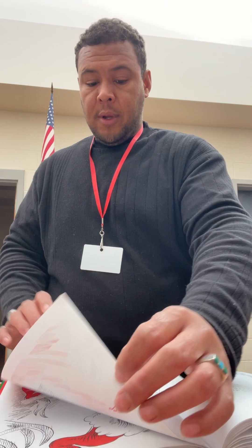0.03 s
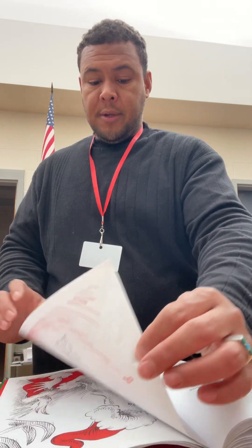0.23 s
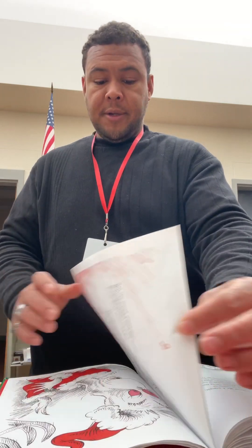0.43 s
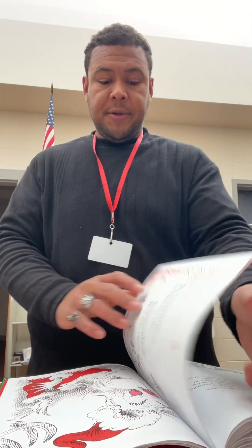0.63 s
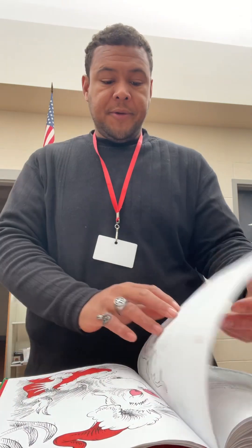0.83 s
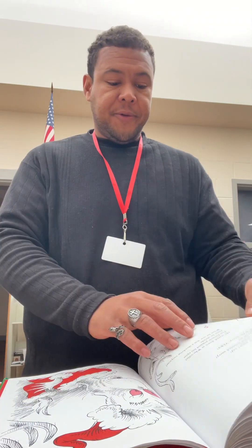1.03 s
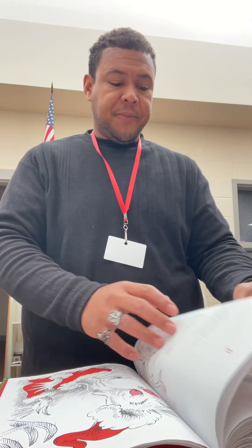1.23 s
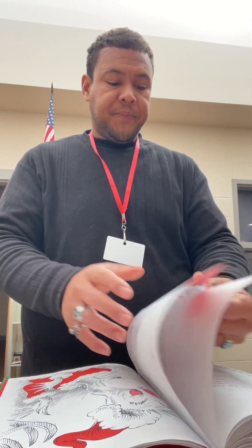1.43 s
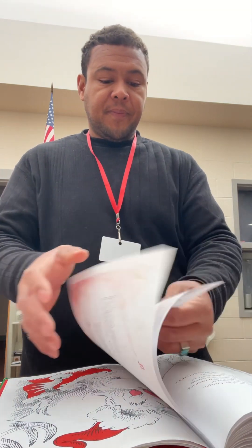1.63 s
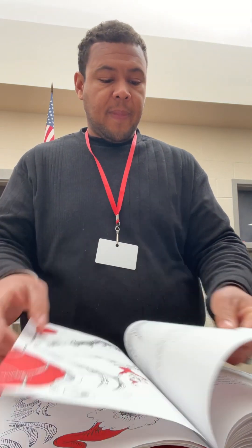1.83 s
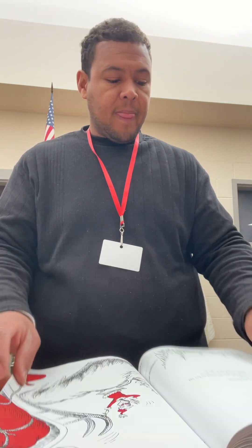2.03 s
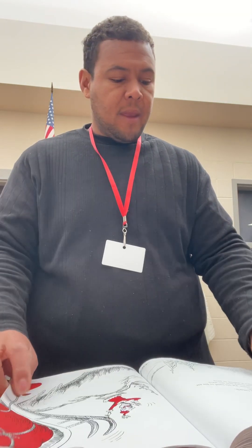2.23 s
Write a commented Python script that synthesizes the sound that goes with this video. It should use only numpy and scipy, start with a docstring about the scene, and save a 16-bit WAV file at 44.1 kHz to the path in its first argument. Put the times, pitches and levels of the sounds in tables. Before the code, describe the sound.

A large book page is turned by hand, buckling in a quick run of snaps. Paper then slides over paper in a grainy swell and flaps softly down, close to the microphone, over low ventilation rumble.

```python
"""Ventilation rumbles in a quiet room as a large, stiff picture-book page is lifted close to the microphone.
The sheet wafts the air and buckles in a run of snaps, each a bending wave whose treble arrives
before its bass. After a second, paper slides over paper in one long grainy swell, with small ticks.
The page flaps softly down, and a last light crease follows."""
import sys
import numpy as np
from scipy import signal
from scipy.fft import rfft, irfft, next_fast_len
from scipy.io import wavfile
from scipy.ndimage import uniform_filter1d, map_coordinates

SR = 44100
rng = np.random.default_rng(int(sys.argv[2]) if len(sys.argv) > 2 else 0)


def generate_wav(signal):
    """Clip the signal to [-1, 1] and save it as 16-bit WAV at the path in sys.argv[1]."""
    frames = np.transpose(np.atleast_2d(signal))
    scaled = np.clip(frames, -1, 1) * 32767
    pcm = np.round(scaled).astype(np.int16)
    wavfile.write(sys.argv[1], SR, pcm)


N = 101429
TIME = np.arange(N) / SR


def amp(db):
    return 10 ** (np.asarray(db) / 20)


def unit(x):
    return x / np.sqrt(np.mean(x ** 2) + 1e-20)


def along(points, hz):
    """Read a curve of (Hz, value) points on a log frequency axis."""
    freqs, values = np.transpose(points)
    return np.interp(np.log(hz + 1), np.log(freqs + 1), values)


def curves(rows):
    """One envelope for each column after the time."""
    times, *columns = np.transpose(rows)
    return [np.interp(TIME, times, column) for column in columns]


def wobble(rate):
    """A random curve with rate knots a second."""
    return map_coordinates(rng.standard_normal(N), [TIME * rate], order=1)


def swell(peak_s, rise, fall):
    """A smooth rise to 1 at the peak and a trailing fall."""
    t = TIME - peak_s
    return np.exp(-.5 * np.where(t < 0, (t / rise) ** 2, np.abs(t / fall) ** 1.45))


def burst(t60, size):
    """Dying noise of energy 1."""
    x = rng.standard_normal(size) * amp(-60 * np.arange(size) / SR / t60)
    return x / np.linalg.norm(x)


def filtered(x, response):
    """Shape x with a complex response, given as a function of frequency."""
    size = next_fast_len(N + SR // 2)
    return irfft(rfft(x, size) * response(np.fft.rfftfreq(size, 1 / SR)), size)[..., :N]


def minimum_phase(gain):
    """The causal response with this gain and the tightest attack."""
    cepstrum = irfft(np.log(np.maximum(gain, 1e-6)))
    folded = np.concatenate([cepstrum[:1], 2 * cepstrum[1:len(cepstrum) // 2]])
    return np.exp(rfft(folded, len(cepstrum)))


# Stereo image of the noise layers. Each row: frequency in Hz, left-right correlation (1 is mono).
STEREO_LIKENESS = [(100, 1), (700, 0.89), (3000, 0.53), (13000, 1)]
def rush(colour_db):
    """Stereo noise of rms 1, coloured by a function of frequency."""
    def mid_and_side(hz):
        width = np.arccos(np.clip(along(STEREO_LIKENESS, hz), -1, 1)) / 2
        return amp(colour_db(hz)) * [np.cos(width), np.sin(width)]
    mid, side = filtered(rng.standard_normal((2, N)), mid_and_side)
    return unit(np.array([mid + side, mid - side]))


# Tone of the ventilation. Each row: frequency in Hz, gain in dB.
VENT_EQ = [(20, -6.5), (60, 1.5), (220, -1.5), (450, -13), (800, -12), (1600, -20), (2200, -10.5),
           (3200, -26), (5500, -30), (13000, -42), (16000, -62)]
def ventilation():
    """A steady bed of rumbling air."""
    return amp(-49.5) * rush(lambda hz: along(VENT_EQ, hz))


def room(x, t60=0.57, predelay_s=0.0074):
    """A diffuse tail, mostly common to left and right."""
    common = burst(t60, SR // 2)
    tails = np.array([common + 0.5 * burst(t60, SR // 2) for _ in range(2)])
    tails = np.pad(tails, ((0, 0), (int(predelay_s * SR), 0)))
    return signal.fftconvolve(x, tails, axes=1)[:, :N]


# Fader ride of the waft. Each row: time in seconds, level in dB.
WAFT_RIDE = [(0, -41.5), (.15, -62.5), (.27, -49), (.47, -44.5), (.65, -65.5)]
# Tone of the waft. Each row: frequency in Hz, gain in dB.
WAFT_EQ = [(25, -17), (60, 0.5), (110, -16.5), (350, -10), (1500, -56.5)]
def waft():
    """The lifted page pushes a low breath of air."""
    level_db, = curves(WAFT_RIDE)
    return amp(level_db) * rush(lambda hz: along(WAFT_EQ, hz))


def wandering_contact(x, depth_db=2.5):
    """The rasp shifts in colour as the contact wanders over the paper."""
    spectra = signal.stft(x, SR, nperseg=512)[2]
    patches = uniform_filter1d(rng.standard_normal(spectra.shape[1:]), size=4, axis=0)
    patches = unit(uniform_filter1d(patches, size=5, axis=1))
    return unit(signal.istft(spectra * amp(depth_db * patches), SR, nperseg=512)[1][:, :N])


def falling_peak(x, peak_s=1.16, peak_hz=8640, boost_db=9.5, octaves_per_s=3.5):
    """A narrow boost sweeps down the hiss as the sheet slides, fading in and out."""
    width_octaves, life_s = .2, 0.19
    hz, t, spectra = signal.stft(x, SR, nperseg=256)
    octaves_off = np.log2((hz[:, None] + 1) / peak_hz) + octaves_per_s * (t - peak_s)
    lift_db = boost_db * np.exp(-(octaves_off / width_octaves) ** 2 - ((t - peak_s) / life_s) ** 2)
    return signal.istft(spectra * amp(lift_db), SR, nperseg=256)[1][:, :N]


# Tone of the paper's rasp and of its finer hiss. Each row: frequency in Hz, gain in dB.
RASP_EQ = [(250, -40), (600, -13.5), (1250, -10), (1700, -8.5), (2230, -1.5), (2700, -9), (3700, -16),
           (4550, -11.5), (5400, -26), (9000, -72)]
HISS_EQ = [(3500, -46), (5200, 7.5), (8500, -2), (14000, -6), (16000, -19.5)]
# The hand's long slide under the next page. Each row: time in seconds, rasp and hiss levels in dB.
SLIDE_RIDE = [(1.08, -86, -93), (1.11, -52, -59), (1.255, -37, -45), (1.41, -43, -54), (1.47, -40.5, -52.5),
              (1.62, -50.5, -64.5), (1.9, -71, -97)]
# Short rubs. Each row: peak time in seconds, rasp and hiss levels in dB, rise and fall in seconds.
RUBS = [(.343, -40.5, -50.5, 0.02, 0.0015), (0.448, -44, -56.5, 0.02, 0.058),
        (.666, -44.5, -70, .01, 0.0087), (1.683, -42, -51, 0.0075, 0.0091),
        (2.286, -52, -62.5, 0.016, .044)]
def sliding(grains_per_s=600, surges_per_s=49.45):
    """Paper rubs on paper in short strokes and one long slide: a grainy rasp under a hiss."""
    rasp_power, hiss_power = amp(curves(SLIDE_RIDE)) ** 2
    for peak_s, rasp_db, hiss_db, rise, fall in RUBS:
        stroke = swell(peak_s, rise, fall)
        rasp_power += (amp(rasp_db) * stroke) ** 2
        hiss_power += (amp(hiss_db) * stroke) ** 2
    grain = unit(amp(wobble(grains_per_s) + 1.67 * wobble(surges_per_s)))
    rasp = grain * wandering_contact(rush(lambda hz: along(RASP_EQ, hz)))
    hiss = falling_peak(rush(lambda hz: along(HISS_EQ, hz)))
    return np.sqrt(rasp_power) * rasp + np.sqrt(hiss_power) * hiss


# Soft flaps and catches. Each row: peak time in seconds, level in dB, rise and fall in seconds,
# band centre in Hz, band half-width in octaves.
SOFT_FLAPS = [(0.018, -41.5, 0.015, 0.0083, 1880, 0.62), (1.469, -38.5, 0.0033, 0.0034, 4100, 0.12),
              (1.671, -40.5, .002, 0.012, 1240, 0.35), (1.762, -40.5, 0.012, 0.015, 750, 0.88),
              (1.875, -39.5, 0.0057, .014, 1050, 1.18), (1.95, -51.5, 0.044, .015, 677, 0.81)]
def flaps(grains_per_s=300):
    """The loose sheet brushes hand and book, catches and lands: grainy swells of band noise."""
    out = np.zeros((2, N))
    for peak_s, db, rise, fall, centre_hz, octaves in SOFT_FLAPS:
        band = rush(lambda hz: -10 * np.log10(1 + (np.log2((hz + 1) / centre_hz) / octaves) ** 8))
        grain = amp(wobble(grains_per_s))
        out += amp(db) * swell(peak_s, rise, fall) * unit(band * grain)
    return out


def desk_scatter(x, t60=0.017, db=-11.5):
    """The desk scatters each snap differently to left and right; the bass stays centred."""
    scattered = signal.fftconvolve(x, burst(t60, SR // 10))[:N]
    side = filtered(scattered, lambda hz: amp(db) * hz / np.hypot(hz, 400))
    return np.array([x + side, x - side])


def thump(snap_s, hz=82.5, t60=0.13, delay_s=0.0046):
    """The whole sheet rebounds after a snap in a low, quickly damped swing."""
    t = np.maximum(TIME - snap_s - delay_s, 0)
    attack = 1 - np.exp(-t * hz * 2)
    return np.sin(2 * np.pi * hz * t) * attack * amp(-60 * t / t60)


# Tone of the tearing fibres. Each row: frequency in Hz, gain in dB.
FIBRE_EQ = [(1500, -72), (4200, 2.5), (6000, -6), (8000, -10.5), (12000, -11), (15500, -19)]
def fibre_spectrum(size, crackle_db, crack_db, crackle_s=0.0074, crack_s=0.00047):
    """One sharp crack, then fibres tear for a moment in a spiky run."""
    t = np.arange(size) / SR
    run = rng.standard_normal(size) ** 3 * np.exp(-(t / crackle_s) ** 4)
    crack = rng.standard_normal(size) * np.exp(-(2 * (t / crack_s - 1)) ** 2)
    tear = amp(crackle_db) * run / np.linalg.norm(run) + amp(crack_db) * crack / np.linalg.norm(crack)
    return amp(along(FIBRE_EQ, np.fft.rfftfreq(size, 1 / SR))) * rfft(tear)


# Overall tone of the sheet. Each row: frequency in Hz, gain in dB.
SHEET_EQ = [(40, 2.5), (100, 3), (300, 1), (1300, -0.5), (1900, -4.5), (2400, -1.5), (3500, -5.5),
            (4500, -3), (5500, -7), (15000, -40)]
# Resonances of the sheet. Each row: centre in Hz, width in Hz, relative strength in dB.
SHEET_RINGS = [(1424, 590, -8), (2178, 257, 9)]
# Reflections from the desk and page under the sheet. Each row: delay in seconds, level in dB.
DESK_ECHOES = [(.0013, -14), (.0032, -13)]
def buckle(start_s, db, dull_hz, crackle_db, crack_db, ring_db, lag_s, thin_hz=39.2):
    """One pulse spreads through the sheet, bass last, rings it briefly and leaves a crackle."""
    size, makeup_db, dull_floor_db = 16384, 18, -16.5
    hz = np.fft.rfftfreq(size, 1 / SR)
    tuning = 1 + .035 * rng.uniform(-1.1, 1)  # each snap finds the sheet bent differently
    rings = sum(amp(gain_db + ring_db) * np.exp(-(2 * (hz - centre * tuning) / width) ** 2)
                for centre, width, gain_db in SHEET_RINGS)
    high_shelf = np.hypot(1 / np.sqrt(1 + (hz / dull_hz) ** 10), amp(dull_floor_db))
    low_cut = hz ** 2 / np.hypot(hz ** 2, thin_hz ** 2)
    tone = minimum_phase(amp(along(SHEET_EQ, hz)) * (1 + rings) * high_shelf * low_cut)
    travel_s = lag_s * (100 / np.maximum(hz, 60)) ** 1.002
    dispersion = np.exp(-2j * np.pi * np.cumsum(travel_s) * hz[1])
    reflections = 1 + sum(amp(echo_db) * np.exp(-2j * np.pi * hz * delay) for delay, echo_db in DESK_ECHOES)
    shiver = amp(-4) * rfft(burst(t60=0.03, size=size))
    spectrum = tone * dispersion * (reflections + shiver) + fibre_spectrum(size, crackle_db, crack_db)
    pre_roll = size // 8  # keeps the ringing ahead of the attack
    pulse = np.roll(irfft(spectrum), pre_roll)
    return amp(db + makeup_db) * np.pad(pulse, (round(start_s * SR), N))[pre_roll:][:N]


# Light creases. Each row: start in seconds, relative level in dB, high-shelf corner in Hz,
# crackle in dB, low cut in Hz.
LIGHT_CREASES = [(.079, -26, 2880, -11, 565), (0.6169, -16, 2550, -32, 553), (0.6544, -33, 4300, -4, 885),
                 (.843, -36, 3100, -7, 970), (0.892, -34, 4100, -11, 510), (2.2832, -29.5, 6400, -10, 1730)]
def creases():
    """Small buckles of the sheet, heard as thin ticks."""
    return sum(buckle(start_s, db, dull_hz, crackle_db, crack_db=crackle_db - 10,
                      ring_db=-3, lag_s=0.00376, thin_hz=thin_hz)
               for start_s, db, dull_hz, crackle_db, thin_hz in LIGHT_CREASES)


# Heavy snaps. Each row: start in seconds, relative level in dB, high-shelf corner in Hz,
# crackle, first crack and ring in dB, bass lag at 100 Hz in seconds.
HEAVY_SNAPS = [(0.17, -20, 2120, -17, -21, -3, 0.0031), (0.2011, -8, 1660, -17.5, -20.5, -4, 0.0089),
               (0.2487, -2.5, 2480, -19.5, -18, 0, 0.00998), (0.345, -4, 2170, -17.5, -13, 0.5, 0.00873),
               (0.3792, -6.5, 1240, -22, -20, -3, 0.00787), (0.4079, -13.5, 1130, -17, -38, -7, 0.00605)]
def snaps():
    """The stiff sheet gives way in a run of buckles, each followed by a thump."""
    return sum(buckle(start_s, db, *timbre) + amp(db - 39) * thump(start_s)
               for start_s, db, *timbre in HEAVY_SNAPS)


def strain(rise_s=0.0058):
    """Fibres creak just before each heavy snap."""
    level = sum(amp(db - 37.5) * swell(snap_s, rise_s, rise_s / 10) for snap_s, db, *_ in HEAVY_SNAPS)
    return level * rush(lambda hz: along(RASP_EQ, hz))


# Pan of the page. Each row: frequency in Hz, left over right in dB.
PAGE_PAN = [(60, .4), (200, 1.6), (550, 1.9), (1500, .2), (4000, -.6)]
def scene():
    """The page lies a little to the left with a touch of room, over dry sliding and air."""
    page = desk_scatter(snaps() + creases()) + strain() + flaps()
    page = filtered(page, lambda hz: amp(np.array([[.5], [-.5]]) * along(PAGE_PAN, hz)))
    return page + amp(-21) * room(page) + sliding() + ventilation() + waft()


# Phase between the microphone's ports. Each row: frequency in Hz, lead of the left in radians.
PORT_PHASE = [(200, 0), (1200, -.35), (4400, -.5), (5400, -3.2), (7500, -4.1), (11000, -6.2)]
def record(dry):
    """The two microphone ports differ in phase and share a low cut, a narrow notch and a band limit."""
    low_cut_hz, notch_hz, top_hz = 42, 4890, 15700
    def response(hz):
        ports = np.exp(1j * np.array([[.5], [-.5]]) * along(PORT_PHASE, hz))
        notch = 1 - .7 * np.exp(-((hz - notch_hz) / 100) ** 2)
        return ports * notch * (hz < top_hz)
    low_cut = signal.butter(2, low_cut_hz, "highpass", fs=SR, output="sos")
    return filtered(signal.sosfilt(low_cut, dry), response)


dry = scene()
out = record(dry)
generate_wav(out)
```